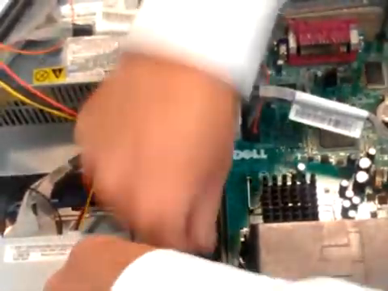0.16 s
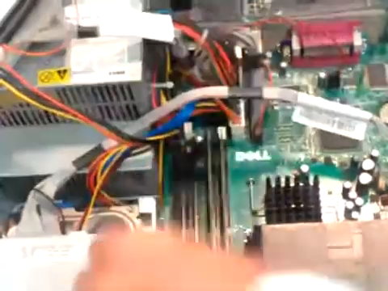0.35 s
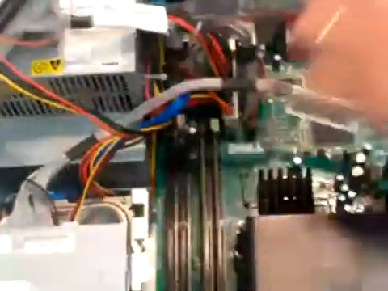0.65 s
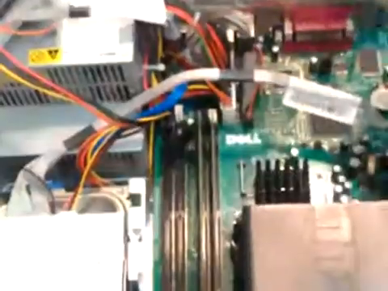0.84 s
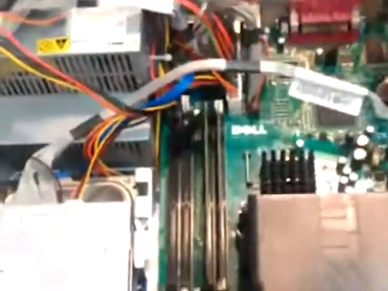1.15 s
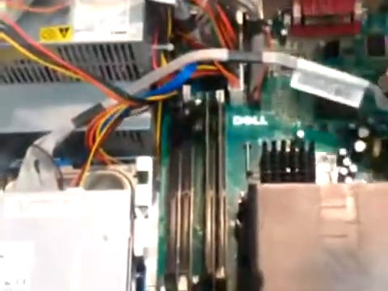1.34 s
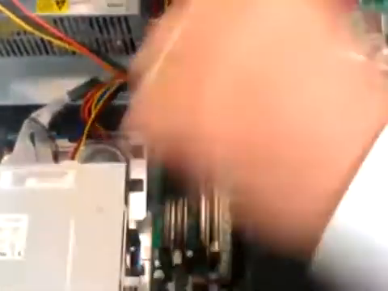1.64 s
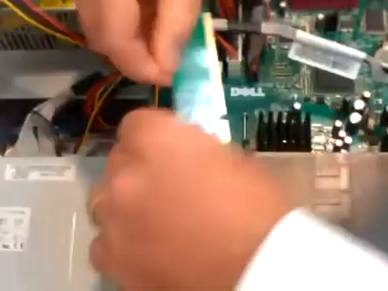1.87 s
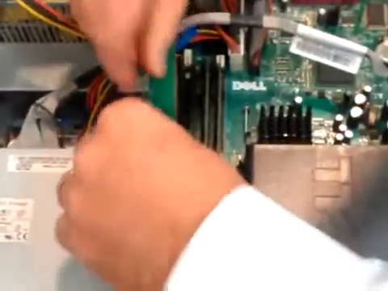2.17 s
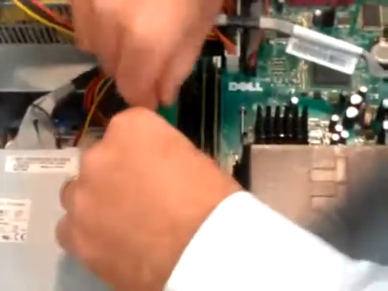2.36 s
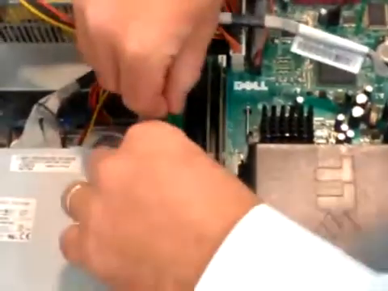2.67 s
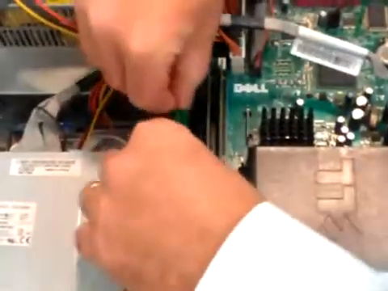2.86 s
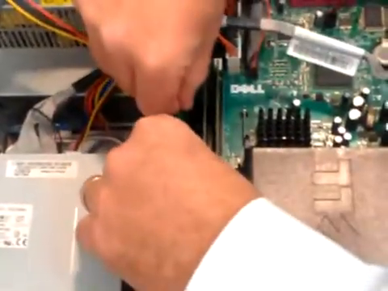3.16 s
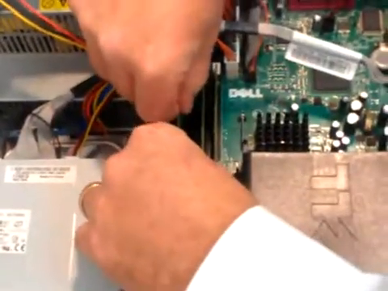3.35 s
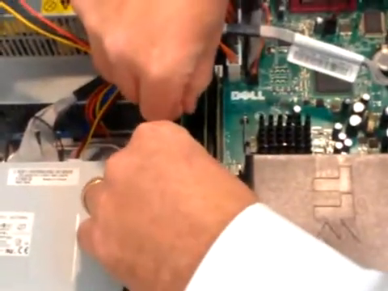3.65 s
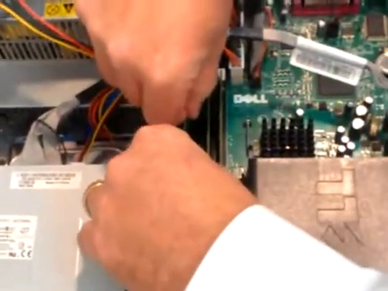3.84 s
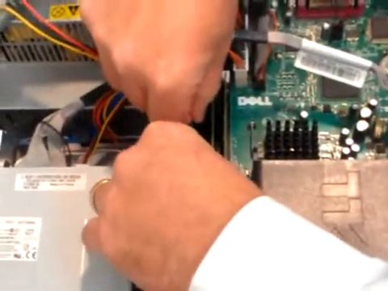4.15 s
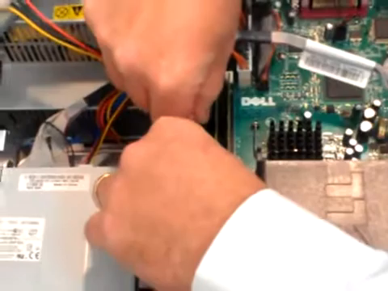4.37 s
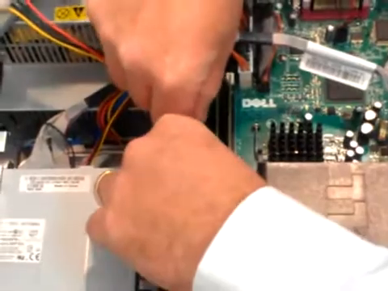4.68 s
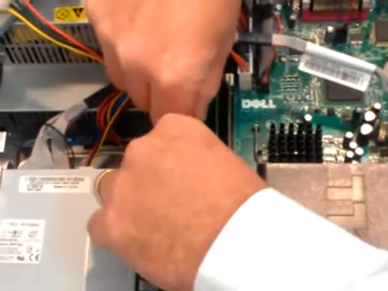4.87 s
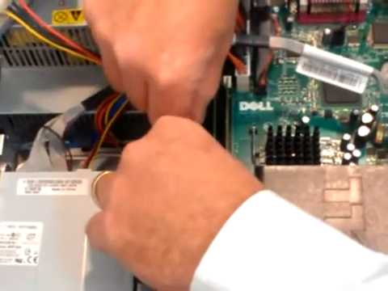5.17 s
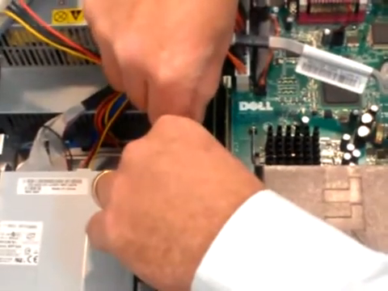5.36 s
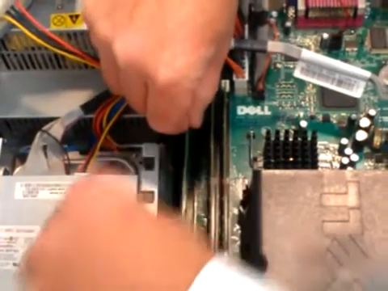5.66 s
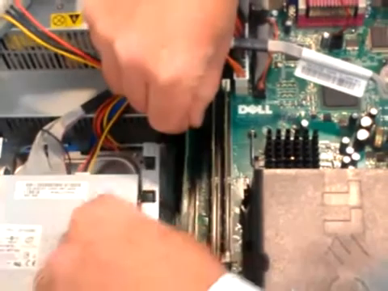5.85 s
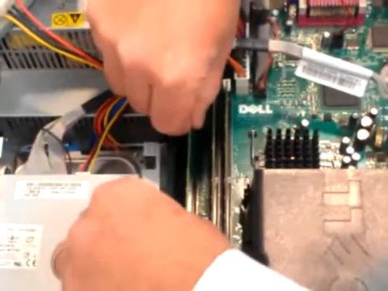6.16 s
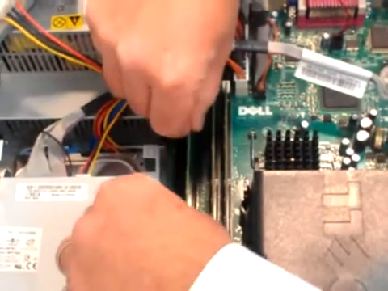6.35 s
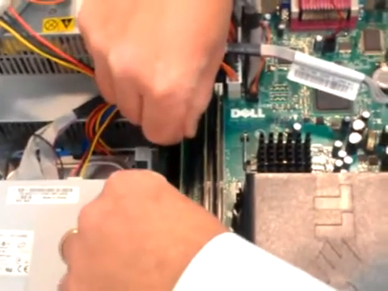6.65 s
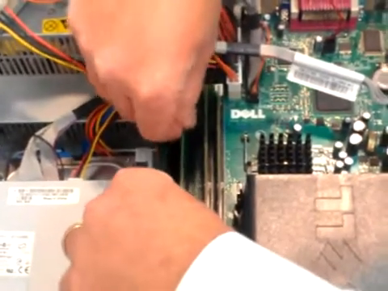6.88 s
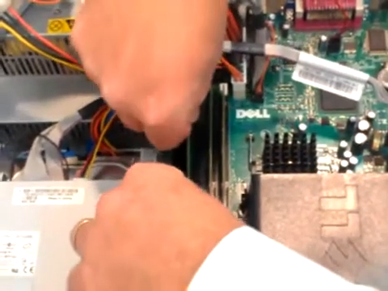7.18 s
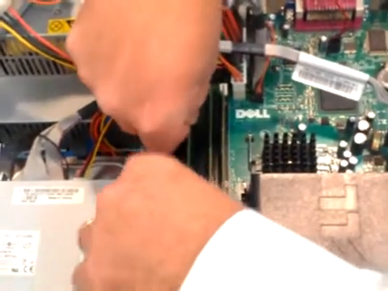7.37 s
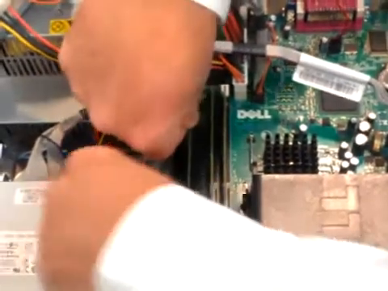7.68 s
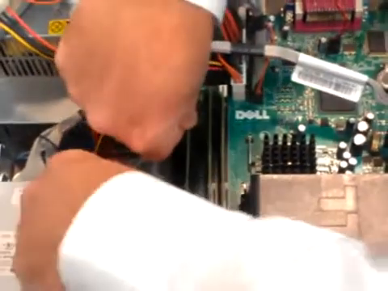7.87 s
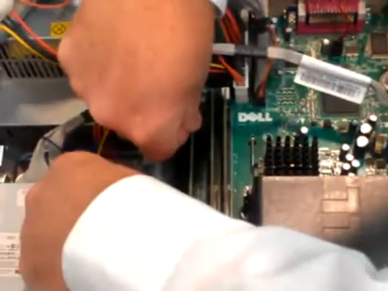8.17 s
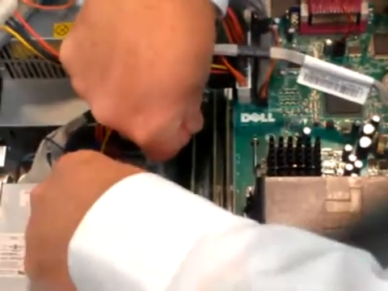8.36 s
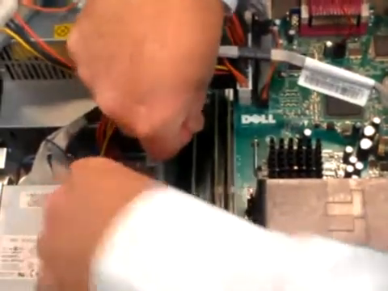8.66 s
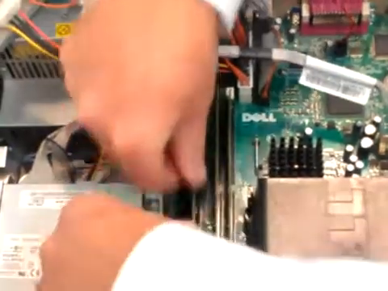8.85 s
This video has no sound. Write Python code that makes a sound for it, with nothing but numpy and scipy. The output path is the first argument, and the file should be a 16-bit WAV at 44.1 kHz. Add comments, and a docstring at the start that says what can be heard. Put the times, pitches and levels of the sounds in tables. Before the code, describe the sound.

Tail of a hard latch snap, then light clicks, a hollow knock and rubbing, until a second very loud sharp snap near the end.

```python
"""A latch snaps hard amid clicks, knocks and rubbing: hands fit memory modules into the slots of an open
computer case, close to a small microphone. The tail of an earlier snap opens the scene.
Contacts, creaks and snaps are enveloped noise that rings board and sheet metal; a hollow part chatters, pushes
bend the board, edges scrape and sleeves rub. The later snap overloads the input, the room rings on, and
fan hum and hiss lie underneath."""
import sys
import numpy as np
from scipy import signal
from scipy.io import wavfile
from scipy.ndimage import uniform_filter1d

SR = 44100
rng = np.random.default_rng(int(sys.argv[2]) if len(sys.argv) > 2 else 0)


def transcribe(signal):
    """Save signal, clipped to [-1, 1], as a 16-bit WAV file at the path in sys.argv[1]."""
    frames = np.atleast_2d(signal).T
    limited = np.clip(frames, -1, 1)
    pcm = np.round(limited * 32767).astype(np.int16)
    wavfile.write(sys.argv[1], SR, pcm)


N = 397782
LEAD = SR // 5  # samples sounded before the scene opens
GRAIN_DB, SNAP_GRAIN_DB = 3.2, 2.0  # unevenness of the tiny impacts


def gain_of(db):
    """Amplitude factor for a level in dB."""
    return 10 ** (np.asarray(db) / 20)


def evened(x):
    """Scale a sound to an RMS of 1."""
    return x / np.sqrt(np.mean(x ** 2) + 1e-20)


def read(points, hz):
    """Read a curve of (frequency, value) points, interpolated over log frequency."""
    f, value = np.transpose(points)
    return np.interp(np.log(hz + 1), np.log(f + 1), value)


def resonate(x, hz, width):
    """A two-pole resonance of gain 1 at its centre."""
    b, a = signal.iirpeak(hz, hz / max(width, 1), SR)
    return signal.lfilter(b, a, x)


def band(x, low_hz, high_hz):
    """A steep causal band-pass that keeps the level of white noise."""
    sos = signal.butter(4, [low_hz, high_hz], "bandpass", fs=SR, output="sos")
    return signal.sosfilt(sos, x) / np.sqrt((high_hz - low_hz) * 2 / SR)


def highpass(x, order, hz):
    """Remove the sound below a corner frequency."""
    return signal.sosfilt(signal.butter(order, hz, "highpass", fs=SR, output="sos"), x)


def grit(count, spread_db, channels=1):
    """Noise of uneven grain: many tiny impacts, a few of them strong; all channels share the grain."""
    strength = np.minimum(rng.exponential(1, count // 32 + 1), 4)
    size = gain_of(spread_db * strength).repeat(32)[:count]
    return evened(size * rng.standard_normal((channels, count))).squeeze()


# Ranges in which a contact drives the parts, in the order main, thud, board, tick: low_hz, high_hz
RANGES = [(2500, 3900), (540, 1200), (1200, 2500), (3900, 15000)]


def rattles(rows, spread_db, thud_lasts, tick_lasts):
    """Every contact drives four ranges of the parts; thud and tick have their own durations."""
    out, t = np.zeros(N + LEAD), np.arange(SR // 3) / SR
    noise = grit(N + LEAD + len(t), spread_db, channels=4)
    for k, lasts in enumerate((1, thud_lasts, 1, tick_lasts)):
        force = np.zeros(noise.shape[1])
        for start_s, level_db, colour_db, rise, hold, t60 in rows:
            at = LEAD + round(start_s * SR)
            rise = np.clip(rise, 2e-4, .04)
            # a sudden contact starts with its hardest impact
            first_hit = 0.0012 / (rise + 0.0013) * np.exp(-abs(t - rise) / 0.0074)
            onset = np.minimum(t / rise, 1) ** 2 * (1 + first_hit)
            dying = np.maximum(t - rise - lasts * max(hold, 0), 0) / (lasts * max(t60, .02))
            range_db = level_db + (0, *colour_db)[k]
            force[at:at + len(t)] += gain_of(range_db - 60 * dying) * onset
        out += band(force * noise[k], *RANGES[k])[:N + LEAD]
    return out


# Latch snaps, before board and case ring: start_s, level_db, level_db of the shudder that follows
SNAPS = [(-.05, -7, -28.5), (8.246, -5, -55)]


def latches():
    """A latch snaps as a dense burst of tiny impacts; both snaps share one colour and one envelope."""
    colour_db = (-8.5, -10, -10)  # thud, board, tick
    rise_s, hold_s, t60_s = 0.00088, 0.0087, 0.11
    rows = [(s, db, colour_db, rise_s, hold_s, t60_s) for s, db, _ in SNAPS]
    return rattles(rows, SNAP_GRAIN_DB, thud_lasts=0.75, tick_lasts=1.0)


# Contacts, before board and case ring: start_s, level_db in the main range,
# then against that level thud_db, board_db, tick_db; last rattle_s
CONTACTS = [(.058, -50.5, -9, -12, -26, 0.059), (.600, -52, -2, -1, 5, 0.024),
            (0.637, -37, -17, -14, 9.5, 0.02), (.862, -42, -17, -7, -18, 0.0057),
            (1.636, -52.5, -17, 1, 5.5, 0.014), (2.200, -54, 2.5, 2, -11, 0.03),
            (2.955, -51.5, -8, -7, -8, 0.017), (3.03, -38.5, -15, -13, -12, 0.0093),
            (3.07, -54, 7, 0, -15, 0.0065), (3.267, -48, -3.5, 0.7, -9, 0.025),
            (3.390, -50.5, 8.5, 14, -14, 0.0068), (3.431, -54, 10.5, 12.5, -15, 0.0041),
            (3.615, -54.5, 5.5, 0, -11, 0.03), (3.917, -50.5, 11.5, 14.5, -16, 0.0045),
            (3.975, -55.5, 7.5, 3.5, -11, .01), (4.074, -45.5, 7, -18, -15, 0.014),
            (4.088, -32, -10.5, -9.5, -1.5, 0.011), (4.285, -35.5, -13, -5, -22, 0.012),
            (4.296, -31.5, -4.5, -8, -24, 0.011), (4.509, -32, -0.5, -5, -24, 0.0077),
            (4.52, -26, -28, -3.5, -20, 0.008), (4.599, -43.5, 4.5, 9.5, -16, 0.0066),
            (5.018, -56, 0, 4, -16, .007), (5.484, -52, 9, 0.5, -6, 0.0094),
            (6.030, -53.5, 3.5, -5, -8, 0.023), (6.442, -59.5, 15, -1.5, -3, 0.0078),
            (6.582, -45.5, 2.5, -2, -15, 0.0086), (6.605, -37, 6.5, 3.5, -13, 0.0088),
            (6.807, -37, 11.5, 8, -28, .008), (7.295, -43.5, -10, -20, -20, 0.0035),
            (7.457, -31.5, -9.5, -8, -17, 0.0065), (7.748, -28, -8.5, -11.5, -13.5, 0.0071),
            (7.945, -49, -9, -6, -1.5, 0.011), (8.042, -54.5, 2, 1.5, -9, .011),
            (8.08, -59, 9, -4, 1, 0.0044), (8.648, -45, 1, 0, -14, .018),
            (8.808, -36.5, -7.5, -21, -18, 0.016), (8.88, -41.5, -8, -12, -15, .014)]
# The plastic strains, swelling up to a hard contact: start_s, level_db, length_s
CREAKS = [(6.783, -35, 0.023), (8.193, -22, 0.04)]


def touches():
    """Contacts and creaks, and the shudder of the case after each snap, all as rattling impacts."""
    # a longer rattle starts softer and dies more slowly
    rows = [(s, db, colour, 0.18 * rattle, rattle, 0.05 + 4.4 * rattle)
            for s, db, *colour, rattle in CONTACTS]
    creak_colour_db, creak_t60_s = (-4, -3.5, -13), 0.096
    swell = 0.62  # share of the creak spent swelling
    rows += [(s, db, creak_colour_db, swell * length, (1 - swell) * length, creak_t60_s)
             for s, db, length in CREAKS]
    shudder_after_s, shudder_colour_db = 0.0595, (-14, -9, -34)
    rise_s, hold_s, t60_s = 0.008, 0.038, 0.4
    rows += [(s + shudder_after_s, db, shudder_colour_db, rise_s, hold_s, t60_s) for s, _, db in SNAPS]
    return rattles(rows, GRAIN_DB, thud_lasts=1.55, tick_lasts=0.67)


# Modes of board and case: pitch_hz, width_hz (before widening), level_db (halved when sounded)
CASE_MODES = [(625, 130, -34), (779, 39, 0), (970, 24, -13), (1333, 69, -13.5), (1730, 81, 7),
              (1972, 63, 13), (2970, 142, 7), (3184, 107, -7.5), (3520, 46, -40), (4800, 350, 6.5)]


def case(x):
    """The parts ring at their modes on top of the direct sound."""
    ringing = sum(gain_of(db / 2) * resonate(x, hz, 1.68 * width) for hz, width, db in CASE_MODES)
    return 0.58 * x + ringing


# A module knocks against a hollow part until a hand damps it:
# level_db applied to the whole mix, chatter_s before damping, t60_s of the crack's longer part
KNOCK = (-15.5, 0.075, 0.25)
# Modes of the hollow part: pitch_hz, level_db against each other, ring_s (nominal, before damping)
HOLLOW = [(645, 1.5, 0.28), (828, -9, 0.35), (937, 7, 0.63), (1258, 11.5, 0.28), (1630, -1, 0.22),
          (1872, -6, 0.13), (2270, -24, 0.18), (1830, -9, 0.13), (2780, -25, 0.19), (2750, -18, 0.12),
          (3080, -25, 0.13), (3315, -9, 0.18), (748, -4.5, 0.25), (3360, -29, 0.14)]


def knock():
    """Chatter keeps the hollow part ringing; a crack rides on it, and both are damped together."""
    start_s = 1.7635
    level_db, chatter_s, crack_t60_s = KNOCK
    t = np.arange(SR // 4) / SR

    def fade(t60_s):
        return gain_of(-60 * t / t60_s)

    blows = grit(len(t), SNAP_GRAIN_DB) * (fade(0.12) + 1.7 * fade(0.011))
    modes = sum(gain_of(db) * np.sqrt(ring_s) * resonate(blows, hz, 2.0 / ring_s)
                for hz, db, ring_s in HOLLOW)
    crack = grit(len(t), SNAP_GRAIN_DB, channels=2) * (fade(crack_t60_s) + 0.89 * fade(0.057))
    sound = gain_of(21.5) * modes
    sound += 0.27 * band(crack[0], 570, 2000)
    sound += 0.16 * band(crack[1], 1560, 3150) * fade(0.64)
    sound += 0.0083 * band(crack[1], 5700, 8000) * fade(0.093)
    damping_db = -60 * np.maximum(t - chatter_s, 0) / 0.13
    out = np.zeros(N + LEAD)
    at = LEAD + round(start_s * SR)
    out[at:at + len(t)] = band(sound, 400, 4300) * gain_of(level_db + damping_db)
    return out


# The board bends under the thumbs and springs back: start_s, ring_db (drive of the modes),
# thump_db, shove_s (time to the peak of the force)
PUSHES = [(6.605, -39, -51, 0.00035), (6.809, -42, -56, .0004), (8.214, -23.5, -40, 0.00027),
          (8.228, -19.5, -40, 0.00059), (8.250, -12, -1, 0.0011), (8.263, -13.5, -33, 0.00049)]
# Low modes of the board: pitch_hz, width_hz, level_db (before weighting by pitch over width)
BOARD = [(238, 66, -7.5), (335.4, 16.5, -3), (385, 23, -2.5), (518, 37, 5), (565, 31, -1)]


def pushes():
    """Short rounded shoves ring the low modes of the board and thump through the air."""
    t, force = np.arange(SR // 20) / SR, np.zeros((2, N + LEAD))
    for start_s, ring_db, thump_db, shove_s in PUSHES:
        at = LEAD + round(start_s * SR)
        u = t / max(shove_s, 1e-4)
        force[:, at:at + len(t)] += gain_of([[ring_db], [thump_db]]) * u * np.exp(1 - u)
    ring = sum(gain_of(db) * resonate(force[0], hz, width) * hz / width for hz, width, db in BOARD)
    return highpass(ring, 3, 190) + highpass(force[1], 2, 170)


# Single soft scrapes of a module edge: start_s, length_s, level_db (before the last band and trim),
# low_hz and high_hz of two resonances, width_hz of each of two passes through the high one
SCRAPES = [(1.17, 0.27, -48.5, 1550, 2950, 250), (2.687, 0.17, -54, 1700, 3160, 800),
           (4.718, 0.13, -50.5, 1930, 3470, 1200), (4.93, 0.12, -49.5, 1980, 3470, 1200),
           (5.47, 0.26, -55, 1020, 3020, 900), (7.308, 0.11, -47, 1440, 3220, 300),
           (7.512, 0.048, -52, 1800, 3200, 400), (8.715, 0.048, -46, 980, 3840, 700)]


def scrapes():
    """Gritty drag noise swells and fades in two resonances of the module."""
    out, noise = np.zeros(N + LEAD), grit(N, spread_db=2.0)
    for start_s, length_s, db, low_hz, high_hz, width in SCRAPES:
        at = round(start_s * SR)
        drag = noise[at:][:round(length_s * SR)]
        low = evened(resonate(resonate(drag, low_hz, 340), low_hz, 380))
        high = evened(resonate(resonate(drag, high_hz, width), high_hz, width))
        sound = low + gain_of(1.5) * high
        out[LEAD + at:][:len(drag)] += gain_of(db) * sound * signal.windows.tukey(len(drag), .6)
    return band(out, 370, 4140) / 2.62


# Fingers and sleeves slide over the parts, points joined by lines: time_s, level_db of the high part,
# tilt_db toward the bass (before a fixed offset)
RUB = [(0.9, -52.5, -10), (1.31, -48, -9), (1.83, -52.5, -2), (2.4, -62, -5), (2.91, -55, 8.5),
       (3.09, -60, 4), (4.6, -57, 4), (5.15, -57.5, 1), (5.81, -64.5, -18), (6.76, -56, 10.5),
       (7.34, -56, 0), (7.64, -48, 2), (8.05, -56.5, -2), (8.39, -49.5, 9), (8.75, -45, 4.5),
       (9.02, -52, 12)]
# Resonances of the rubbed parts: pitch_hz, width_hz (before widening), level_db against each other
RUB_COLOUR = [(1690, 180, -3), (1940, 260, 10), (2944, 184, 11), (3640, 47, -24), (4700, 32, -20)]


def rubbing():
    """Gritty friction noise in a few resonances; the tilt raises or lowers the low band beneath them."""
    time_s, level_db, tilt_db = np.transpose(RUB)
    t = np.arange(-LEAD, N) / SR
    noise = grit(N + LEAD, spread_db=1.0)
    resonances = sum(gain_of(db) * resonate(noise, hz, 1.9 * width) for hz, width, db in RUB_COLOUR)
    high = evened(0.7 * band(noise, 1170, 4120) + resonances)
    low = evened(band(noise, 410, 1140))
    tilt = np.interp(t, time_s, tilt_db)
    return gain_of(np.interp(t, time_s, level_db)) * (high + gain_of(tilt - 8.5) * low)


# A side panel still shaking from the first snap: pitch_hz, width_hz (each of two passes),
# level_db as the scene opens, t60_s
PANEL = (788, 111, -39.5, 2)


def panel():
    """Noise through two equal resonances makes a fuzzy low tone that dies away slowly."""
    hz, width, db, t60_s = PANEL
    t = np.arange(-LEAD, N) / SR
    shake = evened(resonate(resonate(rng.standard_normal(len(t)), hz, width), hz, width))
    return shake * gain_of(db - 60 * abs(t) / t60_s) * (t > SNAPS[0][0])


# How long the room rings: pitch_hz, t60_s
ROOM_DECAY = [(200, 0.34), (600, 0.62), (1500, 0.71), (3000, 1.0), (4500, 0.92), (9000, 0.36)]
# Colour of the room at the start of its tail: pitch_hz, level_db against each other
ROOM_TONE = [(200, -21), (600, -4.5), (1100, 1.5), (2100, 4.5), (2600, 0), (3200, 8), (3850, -7), (4500, 6),
             (6500, -9), (9000, -32)]


def room(x):
    """Sparse echoes of random sign, each band dying at its own speed."""
    taps = np.zeros(SR * 3 // 2)
    at = np.arange(500, len(taps) - 20, 20)
    taps[at + rng.integers(0, 20, len(at))] = rng.choice([-1., 1.], len(at))
    hz, t, z = signal.stft(taps, SR, nperseg=256)
    tail_db = read(ROOM_TONE, hz)[:, None] - 60 * t / read(ROOM_DECAY, hz)[:, None]
    tail = signal.istft(z * gain_of(tail_db), SR, nperseg=256)[1]
    return signal.fftconvolve(x, tail / np.linalg.norm(tail))[:len(x)]


# Spectrum of fans and input hiss: pitch_hz, density_db (per Hz, against each other)
AIR = [(30, -28), (70, -18.5), (130, -27.5), (200, -4), (310, 2.5), (500, -1.5), (1000, -5.5), (2000, -9),
       (3300, -11), (4500, -15), (6500, -16), (8100, -23.5), (9500, -16), (13500, -14)]
# Wavering hum tones: pitch_hz, level_db
HUM = [(118.4, -81), (296, -63)]


def air():
    """Hiss from random short-time spectra with faint patches, and hum tones from narrowed noise."""
    hiss_db = -49.5
    frames, hz = N // 256 + 5, np.fft.rfftfreq(1024, 1 / SR)
    a, b, patches = rng.standard_normal((frames, 513, 3)).T
    patches = evened(uniform_filter1d(uniform_filter1d(patches, 12, 0), 10, 1))
    z = (a + 1j * b) * gain_of(read(AIR, hz)[:, None] + 2.0 * patches)
    hiss = gain_of(hiss_db) * evened(signal.istft(z, nperseg=1024, noverlap=768)[1][:N])
    hum = sum(gain_of(db) * evened(resonate(rng.standard_normal(N), f, 2.3)) for f, db in HUM)
    return hiss + hum


def scene():
    """Snaps and handling near the microphone, their echo in the room, and the air underneath."""
    snaps = latches()
    handling = case(touches()) + knock() + pushes() + scrapes() + rubbing()
    echo = room(gain_of(-22.5) * snaps + gain_of(-28.5) * handling)  # the hands shield the small sounds
    near = case(snaps) + handling + panel()
    return ((near + echo)[LEAD:] + air())[None]


def record(dry):
    """The input clips at full scale and sheds the deepest bass; then the treble is cut off."""
    clipped = highpass(np.clip(dry, -1, 1), 2, 45)
    edge_hz = 14200
    lowpass = signal.firwin(511, edge_hz, window=("kaiser", 9), fs=SR)
    return signal.oaconvolve(clipped, lowpass[None], "same")


dry = scene()
out = record(dry)
transcribe(out)
```